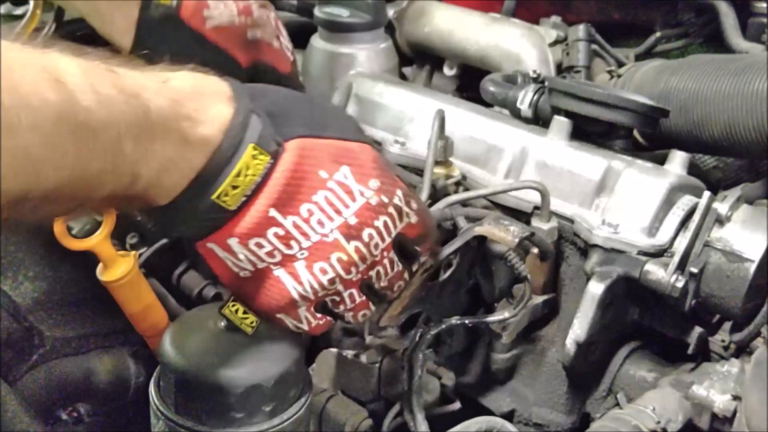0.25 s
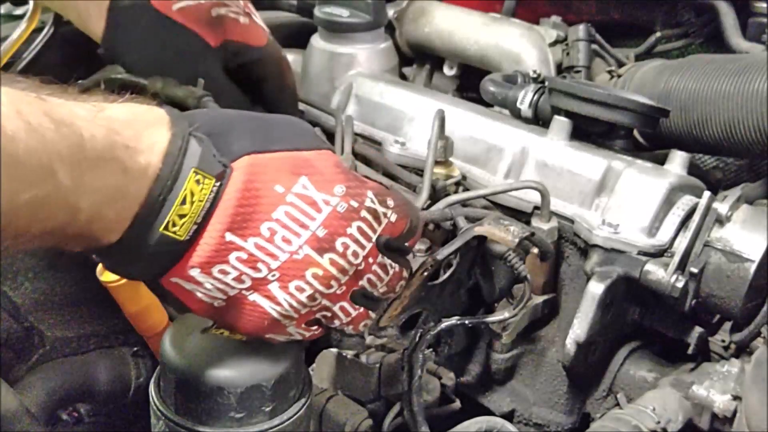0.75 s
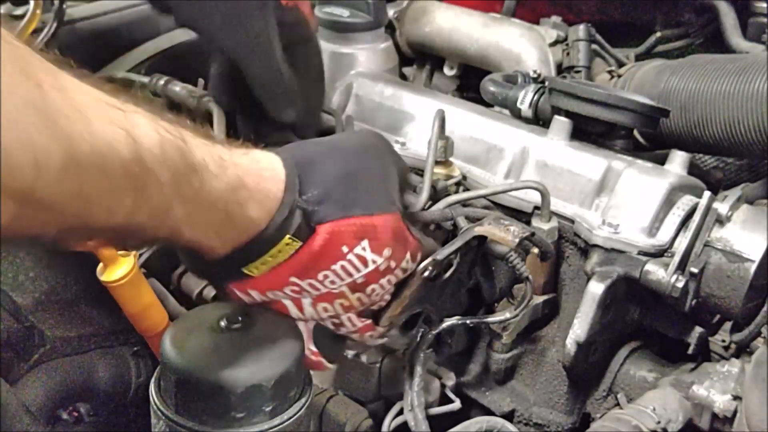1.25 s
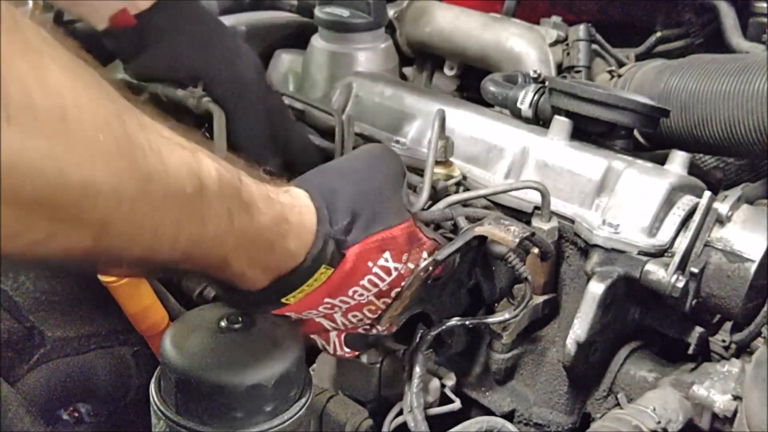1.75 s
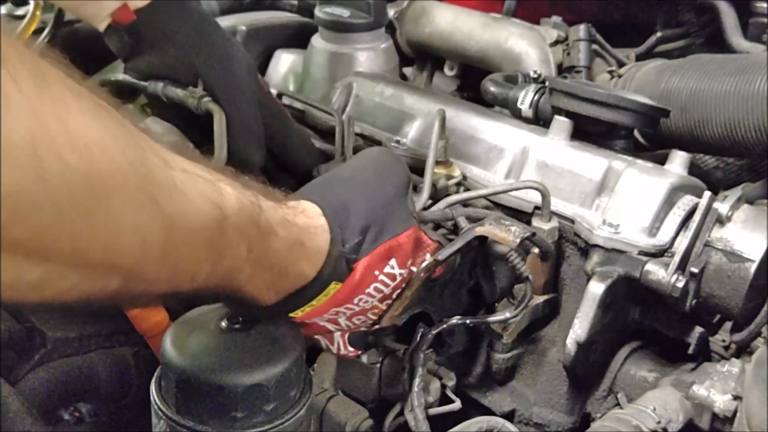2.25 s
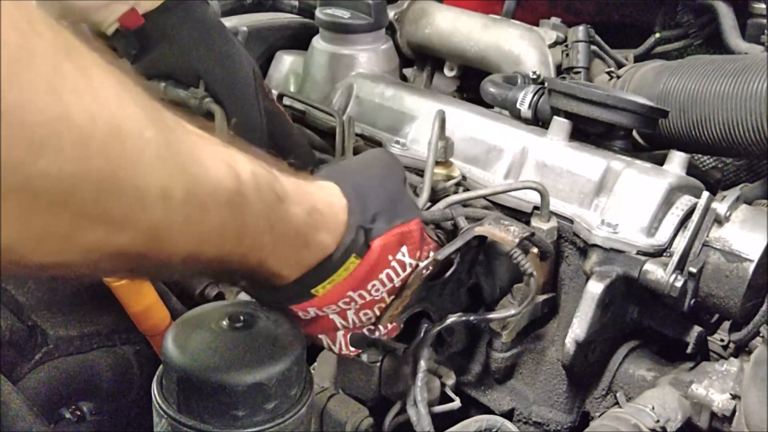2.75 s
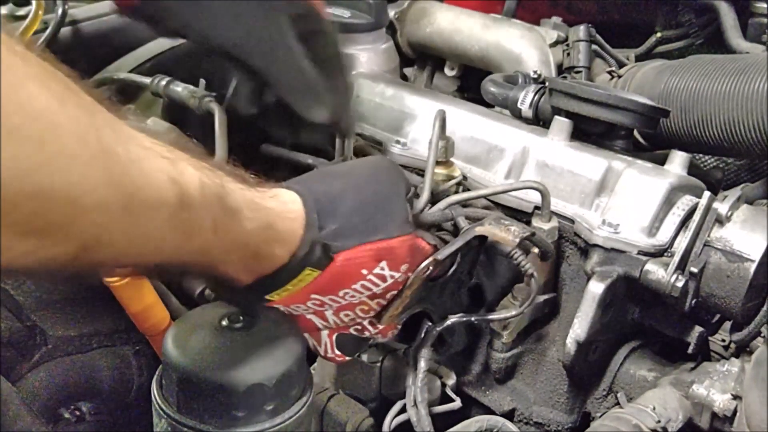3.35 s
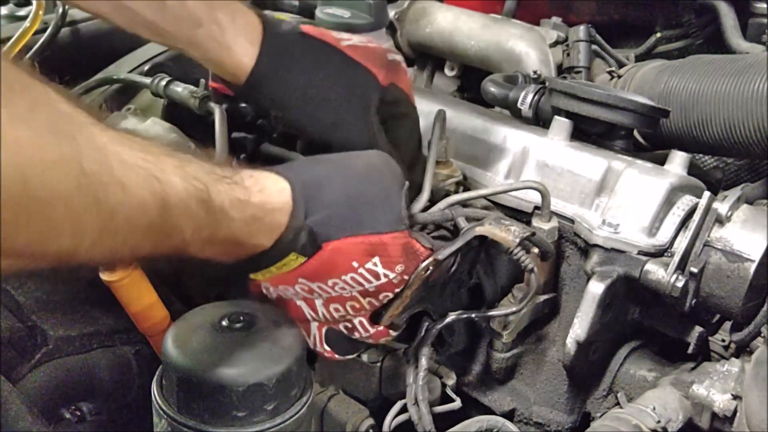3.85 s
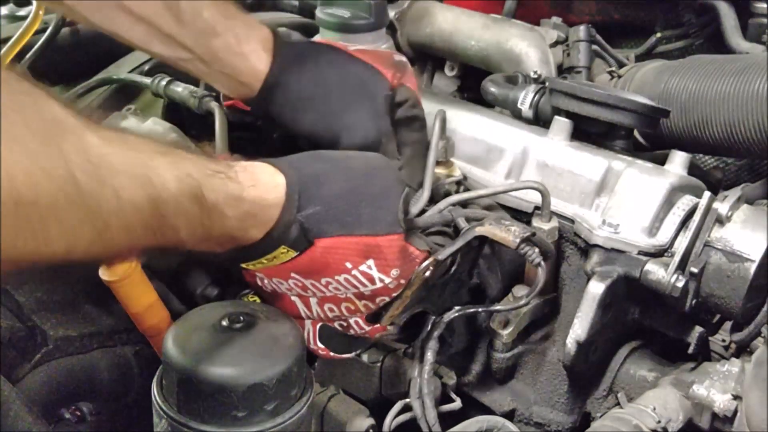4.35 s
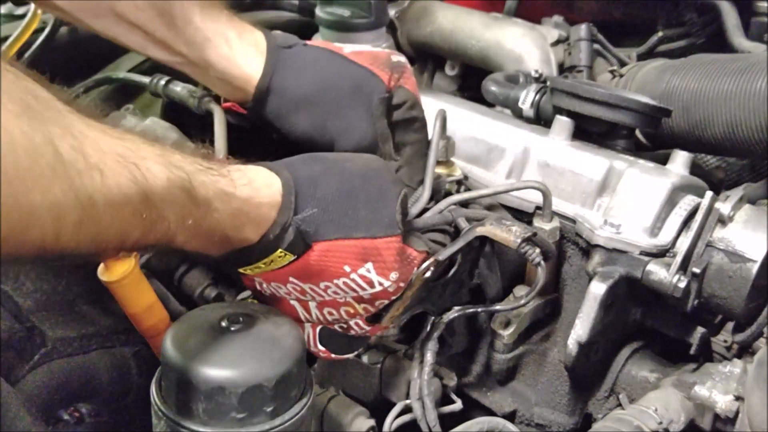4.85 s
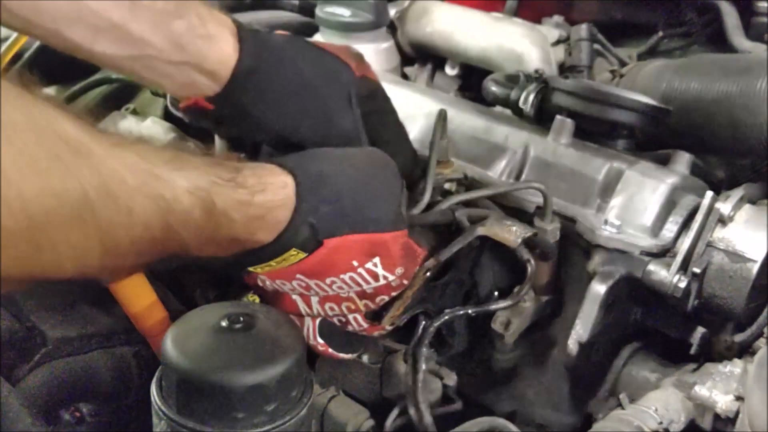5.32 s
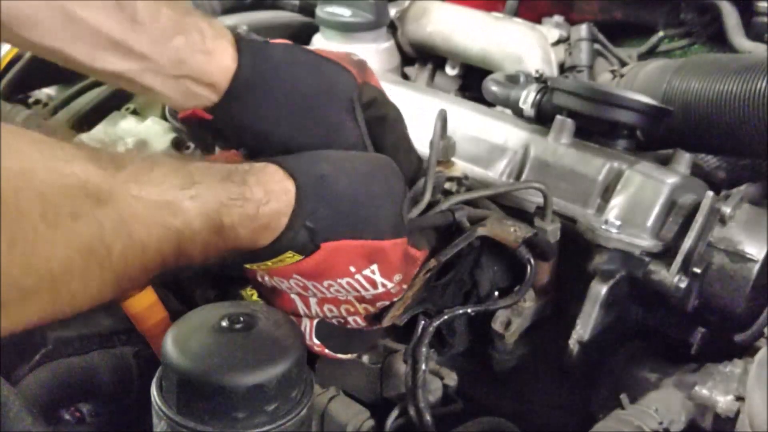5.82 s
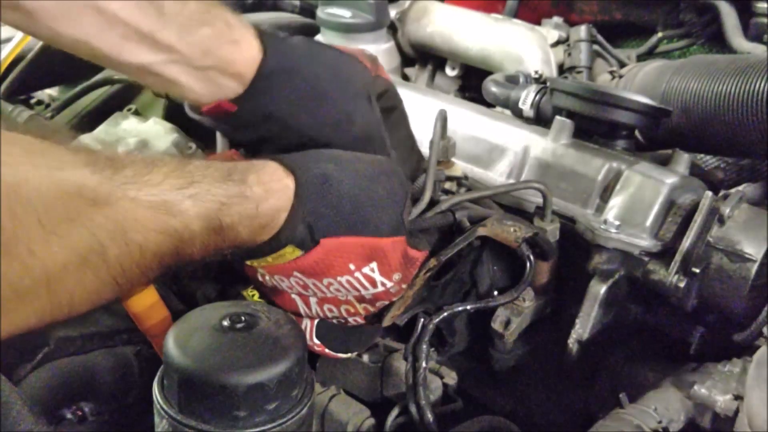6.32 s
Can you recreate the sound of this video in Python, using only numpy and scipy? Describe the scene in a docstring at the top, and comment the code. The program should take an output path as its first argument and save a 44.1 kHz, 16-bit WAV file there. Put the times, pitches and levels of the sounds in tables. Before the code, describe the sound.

Heard close up in a quietly humming workshop, work gloves slide and rasp softly over engine parts while small plastic pieces catch and tick. Past the middle comes the loudest sound, the bright snap of a plastic clip. Wiring pulls loose with a quick crackle and a soft knuckle thud, and the rubbing resumes with one sharp tick and a brief, faint ring from a metal pipe.

```python
"""Gloved hands work a small plastic clip and its wiring loose in an engine bay, heard close up.
First the gloves rub and swipe over hoses, plastic parts catch and tick, and hands bump the engine.
At 4.3 s the clip snaps over its catch. Near 5 s the wiring's stiff sleeve crackles as it pulls free,
and a knuckle thuds on the engine cover. Last come more swipes, a sharp tick and a faint ring of metal.
A workshop hums quietly the whole time."""
import sys
import numpy as np
from scipy import signal
from scipy.fft import rfft, irfft
from scipy.io import wavfile

SR = 44100
rng = np.random.default_rng(int(sys.argv[2]) if len(sys.argv) > 2 else 0)


def master_out(mix):
    """Clip the mix to full scale and print it as 16-bit PCM to the path in sys.argv[1]."""
    frames = np.transpose(np.atleast_2d(mix))
    ceiling = np.clip(frames, -1, 1)
    pcm = np.round(ceiling * 32767).astype(np.int16)
    wavfile.write(sys.argv[1], SR, pcm)


N = 290178
TIME = np.arange(N) / SR


def from_db(db):
    """Turn decibels into a number to multiply a sound by."""
    return 10 ** (np.asarray(db) / 20)


def rms_one(x):
    """Scale a sound so that its average power is 1."""
    return x / np.sqrt(np.mean(x ** 2) + 1e-20)


def fade(t, ring_s):
    """A dying curve that drops 60 dB in the ring time."""
    return from_db(-60 * t / ring_s)


def swell(peak_s, rise_s, fall_s):
    """The power of a short soft stroke, 1 at its peak."""
    return np.exp(-((TIME - peak_s) / np.where(TIME < peak_s, rise_s, fall_s)) ** 2)


def drift(turns_per_s):
    """A random wander around zero, typically about 1 away."""
    return 1.52 * np.interp(TIME * turns_per_s, np.arange(8000), rng.standard_normal(8000))


def add(out, at_s, sound):
    """Mix a sound in at the given time."""
    start = int(at_s * SR)
    out[start:start + len(sound)] += sound[:len(out) - start]


def band(x, hz, octaves, order):
    """Keep only the sound around one pitch."""
    edges = [hz / 2 ** (octaves / 2), min(hz * 2 ** (octaves / 2), SR / 2.2)]
    return signal.sosfilt(signal.butter(order, edges, "band", fs=SR, output="sos"), x + 1e-18)


def no_bass(x, hz):
    """Cut the low notes, since small parts give off only high ones."""
    return signal.sosfilt(signal.butter(4, hz, "high", fs=SR, output="sos"), x + 1e-18)


def colour(x, tone):
    """Make each pitch louder or softer, following a tone table."""
    size = 2 ** 13
    hz, db = np.transpose(tone)
    grid_hz = np.arange(size // 2 + 1) * SR / size
    curve_db = np.interp(np.log(grid_hz + 1), np.log(hz), db)
    # build the filter so that it never rings before a hit (minimum phase)
    cepstrum = irfft(np.log(from_db(curve_db)))
    cepstrum[1:size // 2] *= 2
    cepstrum[size // 2 + 1:] = 0
    response = irfft(np.exp(rfft(cepstrum)))
    return signal.fftconvolve(x, response)[:len(x)]


def tiny_slips(per_s, spread_db):
    """A surface catches and lets go: many tiny clicks of uneven size."""
    sizes = from_db(spread_db * np.minimum(rng.exponential(1, N), 4))
    return sizes * rng.choice([-1, 1], N) * (rng.random(N) < per_s / SR)


def impacts(hits, octaves, crack_db, order):
    """Each hit is a sharp crack and a dying burst of noise around its pitch."""
    out, t = np.zeros(N), TIME[:SR // 2]
    for at_s, level_db, hz, ring_s in hits:
        decay = fade(t, ring_s)
        burst = rng.standard_normal(len(t)) * decay
        burst[0] = from_db(crack_db)
        burst = band(burst, hz, octaves, order)
        add(out, at_s, from_db(level_db) * burst * np.linalg.norm(decay) / np.linalg.norm(burst))
    return out


def ringing(notes):
    """A struck part rings with pure notes that die away."""
    out, t = np.zeros(N), TIME[:SR // 2]
    for at_s, level_db, hz, ring_s in notes:
        add(out, at_s, from_db(level_db) * fade(t, ring_s) * np.sin(2 * np.pi * hz * t))
    return out


# the light sliding that never quite stops: (time [s], relative hiss level [dB])
GLOVE_SLIDE = [(0.0, -54), (0.38, -60.5), (0.9, -54), (1.01, -47), (1.32, -46.5), (1.48, -74), (1.77, -50),
               (1.85, -59), (2.14, -52), (2.22, -64), (2.71, -53.5), (3.13, -60), (3.91, -53.5),
               (4.09, -60), (4.6, -62), (5.12, -53), (5.33, -60), (6.58, -62.5)]
# single finger strokes; pressed harder, they rasp more:
# (peak time [s], rise [s], fall [s], relative hiss level [dB], rasp offset from that level [dB])
FINGER_SWIPES = [(0.122, 0.037, 0.021, -47.5, -9.5), (0.213, 0.035, 0.014, -50, -38),
                 (0.293, 0.007, 0.02, -49, -11), (0.492, 0.065, 0.041, -50.5, -9.5),
                 (0.645, 0.037, 0.036, -49.5, -12.5), (0.747, 0.04, 0.038, -49.5, -15.5),
                 (0.978, 0.02, 0.016, -36, -21.5), (1.371, 0.0088, 0.0047, -36.5, -27),
                 (1.405, 0.06, 0.039, -40.5, -8.5), (1.518, 0.012, 0.011, -49, -9),
                 (1.585, 0.042, 0.042, -43, -20), (1.828, 0.0068, 0.0028, -42.5, -18),
                 (2.284, 0.017, 0.012, -53.5, -12), (2.359, .014, 0.0044, -45.5, -15.5),
                 (2.588, 0.042, 0.019, -47, -16), (2.851, 0.028, 0.012, -42, -12.5),
                 (2.992, 0.0086, 0.0099, -46, -11.5), (3.24, 0.038, 0.031, -40, -18),
                 (3.284, 0.018, 0.019, -48, -18), (3.451, 0.074, 0.053, -51.5, -17),
                 (3.823, 0.0076, 0.01, -68, -29), (3.883, 0.0056, 0.0047, -50, -27),
                 (3.961, 0.017, 0.0054, -46.5, -13), (4.814, 0.063, 0.042, -54.5, -11.5),
                 (4.992, 0.026, 0.034, -44.5, -15), (5.075, 0.03, 0.035, -54, -4),
                 (5.134, .01, 0.0053, -48.5, -7), (5.545, 0.019, 0.0061, -43.5, -12.5),
                 (5.612, 0.066, 0.01, -56, -13), (5.963, 0.054, 0.081, -57.5, -10),
                 (6.045, 0.014, 0.019, -46.5, -29), (6.414, 0.069, 0.081, -53.5, -11.5),
                 (6.455, 0.015, 0.018, -45.5, -27)]
# tone of the fabric's hiss: (pitch [Hz], relative level [dB])
FABRIC_TONE = [(800, -26), (2500, -18.5), (5000, -11), (6500, -6), (7500, -4), (8700, 1.5), (9600, -5),
               (11000, -12), (12500, -16.5), (16000, -19.5)]
def gloves():
    """Sliding fabric hisses and rasps; finger strokes swell out of it, and the grip makes it stutter."""
    hiss_power = from_db(np.interp(TIME, *np.transpose(GLOVE_SLIDE))) ** 2
    rasp_power = hiss_power * from_db(-12.5) ** 2   # a light grip rasps less
    for peak_s, rise_s, fall_s, hiss_db, rasp_db in FINGER_SWIPES:
        stroke = swell(peak_s, rise_s, fall_s)
        hiss_power += stroke * from_db(hiss_db) ** 2
        rasp_power += stroke * from_db(hiss_db + rasp_db) ** 2
    grip = from_db(1.1 * drift(45) + 0.9 * drift(260))
    threads = rms_one(colour(tiny_slips(per_s=15000, spread_db=2.5), FABRIC_TONE))
    hiss = from_db(1.28) * np.sqrt(hiss_power) * threads
    rasp = from_db(11.5) * np.sqrt(rasp_power) * scrape(wobble_db=1.1)
    return grip * (hiss + rasp)


# tone of the rough slips: (pitch [Hz], relative level [dB])
RASP_TONE = [(300, -39), (800, -1.5), (1150, -1.5), (1450, 0), (1650, -3), (2000, -1), (2250, -1.5),
             (2700, -1), (3300, -3.5), (4300, -3), (6000, -4), (9000, -14), (16000, -24)]
# the rasp is low and broad on hollow covers, high and focused on thin hoses:
# (time [s], pitch [Hz], drop on either side of that pitch [dB per octave])
RASP_PATH = [(0.1, 2360, 6.5), (.8, 2650, 4), (1.1, 3230, 5), (1.37, 5100, 8.5), (1.44, 4900, 10.5),
             (1.55, 4000, 0.5), (1.82, 2760, 4.5), (2.6, 3600, 6.5), (2.85, 4180, 7), (3.25, 4100, 2),
             (3.9, 3750, 4.5), (4.2, 2600, 0), (4.8, 4860, 8), (5.05, 2960, 0.5), (5.55, 3930, 5),
             (6.45, 4200, 1.5)]
def scrape(wobble_db):
    """Slips make the touched part ring; its strongest pitch shifts as the fingers move."""
    times, pitches, drops = np.transpose(RASP_PATH)
    pitch_hz = np.interp(TIME, times, pitches)
    drop_db = np.interp(TIME, times, drops)
    slips = [colour(tiny_slips(per_s=6000, spread_db=4.0), RASP_TONE) for _ in range(2)]
    out, power = 0, 0
    for k, hz in enumerate(np.geomspace(700, 8000, 22)):
        ring = band(slips[k % 2], hz, octaves=1 / 3, order=2)
        octaves_away = np.abs(np.log2(hz / pitch_hz))
        gain = from_db(-drop_db * octaves_away + wobble_db * drift(20))
        out += gain * ring
        power += gain ** 2 * np.var(ring)
    return out / np.sqrt(power)


SNAP_HITS = [(4.3157, -8.5), (4.3168, -19), (4.3190, -18.5)]
CLIP_NOTES = [(4700, -26), (5750, -4.5), (6200, -2.5), (6750, -0.5), (7250, 0.5), (8800, -7.5), (9900, -17),
              (14700, -31)]
def clip_snap():
    out, t = np.zeros(N), TIME[:SR // 10]
    decay = fade(t, ring_s=0.007)
    for at_s, level_db in SNAP_HITS:
        crack = rng.standard_normal(len(t)) * decay ** 2
        add(out, at_s, from_db(level_db - 20) * crack)
        for hz, note_db in CLIP_NOTES:
            bent_hz = hz * (1 + rng.normal(0, 0.015))   # bent plastic is a little out of tune each time
            ring = decay * np.sin(2 * np.pi * bent_hz * t)
            add(out, at_s, from_db(level_db + note_db) * band(ring, hz, octaves=0.21, order=1))
    return no_bass(out, hz=3200)


# tone of the snap as it spreads through the bay: (pitch [Hz], relative level [dB])
SPREAD_TONE = [(2000, -27), (4000, -20), (5200, -5), (5900, -2), (7000, 1), (8200, -9), (9000, -5),
               (10000, -16), (12000, -28), (16000, -30)]
def snap_spread():
    out = np.zeros(N)
    click = colour(signal.unit_impulse(SR // 10), SPREAD_TONE)
    add(out, SNAP_HITS[0][0], from_db(6.5) * click / np.linalg.norm(click))
    return out


# ticks of small plastic parts: (time [s], relative level [dB], ring time [s])
PLASTIC_TICKS = [(0.54, -39, 0.013), (2.2742, -44, 0.024), (2.4196, -43, 0.019), (2.52, -37, 0.0088),
                 (2.59, -32, 0.012), (2.659, -42, 0.031), (2.706, -40, 0.014), (2.99, -38, 0.019),
                 (3.2255, -22.5, 0.011), (3.2268, -20.5, 0.014), (3.2302, -24.5, 0.015),
                 (3.385, -34.5, 0.014), (3.6087, -42.5, 0.019), (3.779, -40, 0.011), (3.811, -37, 0.013),
                 (3.815, -34, 0.014), (3.881, -38, .012), (4.2942, -39, 0.022), (4.523, -49, 0.017),
                 (4.9357, -41, .018), (4.9449, -32, 0.0081), (4.9478, -24, 0.012), (4.95, -24, 0.011),
                 (4.9597, -35, .011), (4.9676, -22.5, 0.016), (4.9726, -26, 0.021), (4.979, -26, 0.01),
                 (4.983, -33, 0.014), (4.9935, -35, 0.023), (5.036, -43, 0.02), (5.063, -27, 0.011),
                 (5.0825, -35, 0.017), (5.084, -29, 0.014), (5.0881, -33, 0.021), (5.54, -36, 0.008),
                 (5.546, -43, 0.009), (5.868, -42, 0.027), (5.997, -18, 0.0063), (6.163, -43.5, 0.017)]
# tone of the plastic, for both ticks and crackle: (pitch [Hz], relative level [dB])
PLASTIC_TONE = [(1000, -6), (2400, -8), (3400, -4.5), (4500, -3.5), (6500, -2), (8800, 1.5), (10000, -6),
                (11000, -16.5), (11900, -9.5), (13000, -20.5), (15000, -10.5), (16000, -13)]
def ticks():
    """Plastic parts catch and let go; the tighter they are held, the shorter and higher they ring."""
    usual_hz, usual_ring_s, stiffening = 8360, 0.021, 0.55
    hits = [(at_s, level_db, usual_hz * (usual_ring_s / ring_s) ** stiffening, ring_s)
            for at_s, level_db, ring_s in PLASTIC_TICKS]
    clicks = impacts(hits, octaves=0.57, crack_db=13, order=1)
    return from_db(5) * no_bass(colour(clicks, PLASTIC_TONE), hz=2570)


def sleeve_crackle():
    """The wiring's stiff sleeve is dragged free in a quick run of tiny plastic cracks."""
    slips = tiny_slips(per_s=990, spread_db=6.0)
    cracks = rms_one(no_bass(colour(slips, PLASTIC_TONE), hz=2420))
    pull = np.sqrt(swell(peak_s=4.982, rise_s=0.022, fall_s=0.045))
    return from_db(-45.5) * pull * cracks


# knocks on the engine: (time [s], level [dB], middle pitch [Hz], ring time [s])
ENGINE_KNOCKS = [(.123, -45, 1910, 0.042), (1.8186, -43.5, 2970, 0.036), (1.828, -48.5, 2900, 0.03),
                 (3.2386, -38.5, 1250, 0.013), (3.9435, -42.5, 3420, 0.016), (4.1995, -59, 1610, 0.62),
                 (4.991, -50, 900, 0.073), (5.026, -54, 506, 0.15), (5.0265, -55.5, 1310, 0.18),
                 (5.075, -60, 780, 0.75), (5.997, -38, 3180, 0.0092), (6.0393, -47, 845, 0.078),
                 (6.070, -43.5, 1580, 0.066)]
# notes of the knocked metal pipes: (time [s], level [dB], pitch [Hz], ring time [s])
PIPE_NOTES = [(1.819, -44.5, 2840, 0.055), (6.070, -46, 1395, 0.06), (6.070, -48, 2006, 0.11)]
def knocks():
    """Parts and knuckles knock on the engine, and twice a metal pipe rings on briefly."""
    return impacts(ENGINE_KNOCKS, octaves=1.34, crack_db=-13, order=2) + ringing(PIPE_NOTES)


# the notes of the engine cover: (pitch [Hz], relative level [dB], ring time [s])
COVER_NOTES = [(120, -4, .08), (203, -6.5, 0.034), (261, -4, 0.066), (405, -6.5, 0.045), (1020, -9, .06),
               (1400, -13, 0.096)]
def knuckle_thud(at_s, level_db):
    """As the wiring gives way, a knuckle lands on the engine cover and sets its low notes ringing."""
    return ringing([(at_s, level_db + note_db, hz, ring_s) for hz, note_db, ring_s in COVER_NOTES])


# soft bumps and dull scuffs of the hand: (peak time [s], length [s], level [dB], pitch [Hz])
HAND_BUMPS = [(0.312, 0.054, -55.5, 104), (0.362, 0.066, -62.5, 190), (0.515, 0.074, -54, 104),
              (0.569, 0.09, -65, 178), (1.79, 0.061, -59, 105), (1.83, 0.08, -61.5, 177),
              (2.56, 0.15, -60, 58), (2.791, 0.065, -60.5, 158), (2.965, 0.038, -56.5, 95),
              (3.29, 0.14, -65, 81), (4.22, 0.11, -68, 160), (4.732, 0.15, -65, 980),
              (5.085, 0.1, -61, 162), (6.077, 0.096, -67.5, 210), (6.457, 0.1, -62, 60)]
def bumps():
    """A padded hand makes no crack: the part swells with a dull note and a weaker, higher one."""
    out, t = np.zeros(N), TIME[:SR // 2]
    middle_s = t.mean()
    for peak_s, length_s, level_db, hz in HAND_BUMPS:
        shape = np.exp(-2 * ((t - middle_s) / length_s) ** 2)
        for pitch_ratio, note_db in [(1, 0), (1.72, -9.5)]:
            bump = shape * band(rng.standard_normal(len(t)), hz * pitch_ratio, octaves=0.57, order=2)
            bump *= np.linalg.norm(shape) / np.linalg.norm(bump)
            add(out, peak_s - middle_s, from_db(level_db + note_db) * bump)
    return out


def engine_echoes(x, count, echo_db, wander_s):
    """Nearby metal adds a few quick echoes to a sound, and they shift as the hands move."""
    out = x.copy()
    for delay_s in rng.uniform(0.001, 0.008, count):
        moving_delay_s = delay_s + wander_s * drift(4)
        out += from_db(echo_db) * np.interp(TIME - moving_delay_s, TIME, x)
    return out


def room(x):
    """Sound scatters quickly among the engine parts, then dies away faintly between bonnet and walls."""
    t, response = TIME[:SR], 0
    # (level [dB], ring time [s], delay [s])
    scatter, walls = (-15, 0.051, 0.002), (-21.5, 0.51, 0.004)
    for level_db, ring_s, delay_s in (scatter, walls):
        tail = rng.standard_normal(SR) * fade(t, ring_s) * (t > delay_s)
        response += from_db(level_db) * tail / np.linalg.norm(tail)
    return signal.fftconvolve(x, response)[:N]


# tone of the workshop's rumble and air vents: (pitch [Hz], relative level [dB])
WORKSHOP_TONE = [(20, 6), (55, -0.5), (90, -10), (160, -16.5), (330, -21), (440, -17), (535, -6.5),
                 (700, -15.5), (950, -27.5), (1400, -27.5), (2100, -24), (3500, -44.5), (8000, -42)]
# tone of the microphone's hiss: (pitch [Hz], relative level [dB])
HISS_TONE = [(2000, -12.5), (4000, -16), (6500, 1), (8700, -5), (10500, -12), (12500, 0), (16000, -3)]
def background():
    """The workshop rumbles and its air vents give a hollow hum, with a faint steady microphone hiss."""
    hum = from_db(-53.5) * rms_one(colour(rng.standard_normal(N), WORKSHOP_TONE))
    hiss = from_db(-66.5) * rms_one(colour(rng.standard_normal(N), HISS_TONE))
    return hum + hiss


def scene():
    """All the handling is close by, and the same in the left and right ear."""
    knocking = knocks()
    rubbing = engine_echoes(gloves() + sleeve_crackle(), count=6, echo_db=-15.5, wander_s=0.000189)
    hands = rubbing + ticks() + knocking + knuckle_thud(at_s=5.0262, level_db=-39) + bumps()
    mix = hands + clip_snap() + room(hands + snap_spread()) + background()
    return np.tile(mix, (2, 1))


def record(dry):
    """Cut the deepest rumble and the very highest hiss."""
    lowest_hz, highest_hz = 23, 15900
    low_cut = signal.butter(2, lowest_hz, "high", fs=SR, output="sos")
    high_cut = signal.ellip(10, 0.1, 70, highest_hz, fs=SR, output="sos")
    return signal.sosfilt(high_cut, signal.sosfilt(low_cut, dry))


dry = scene()
out = record(dry)
master_out(out)
```